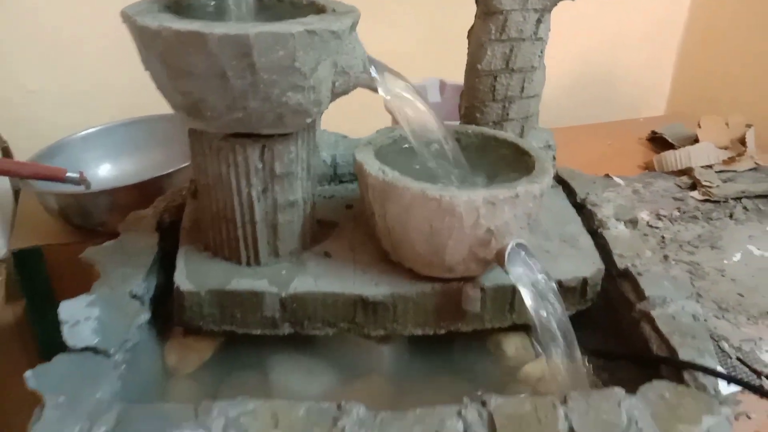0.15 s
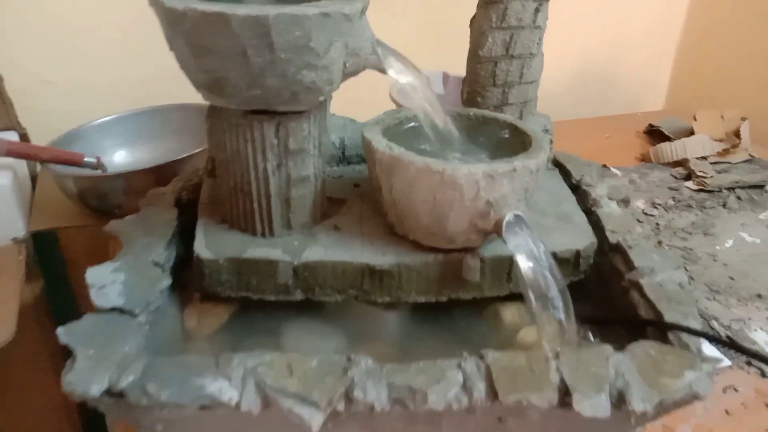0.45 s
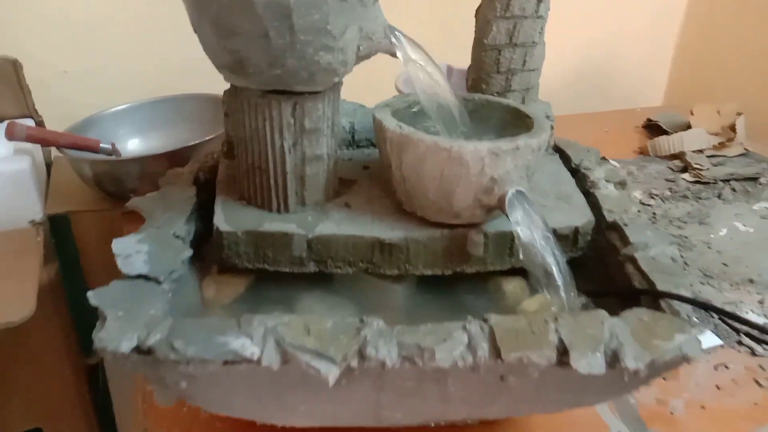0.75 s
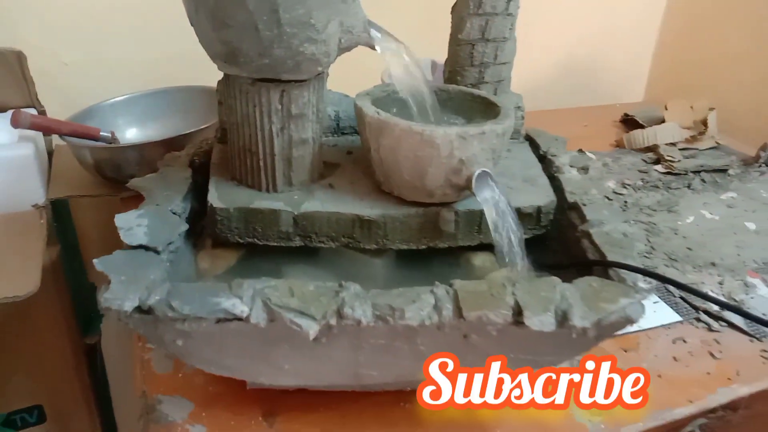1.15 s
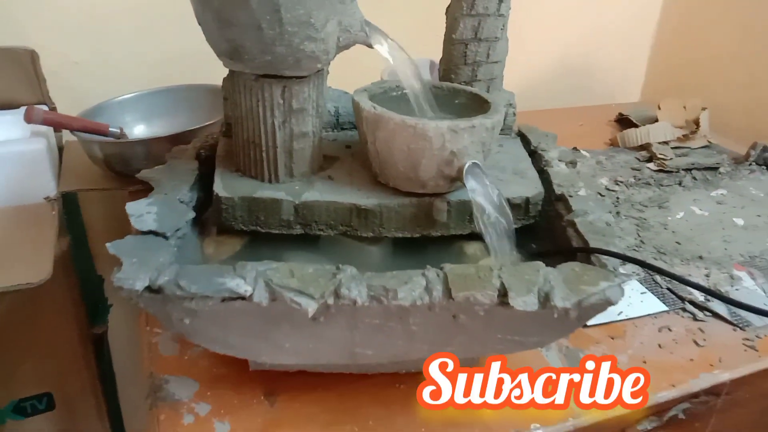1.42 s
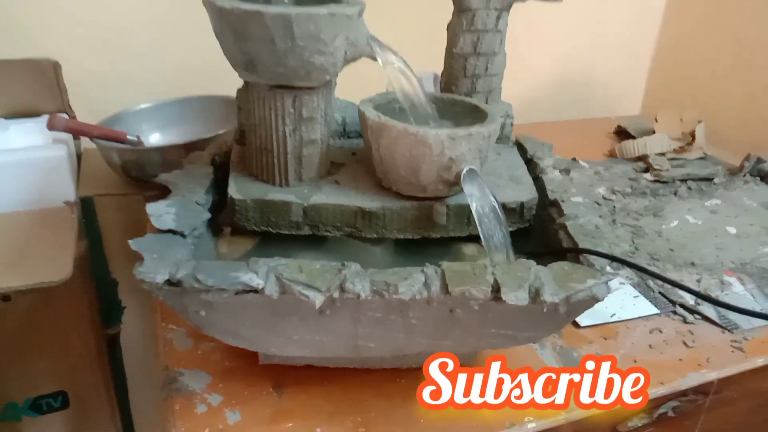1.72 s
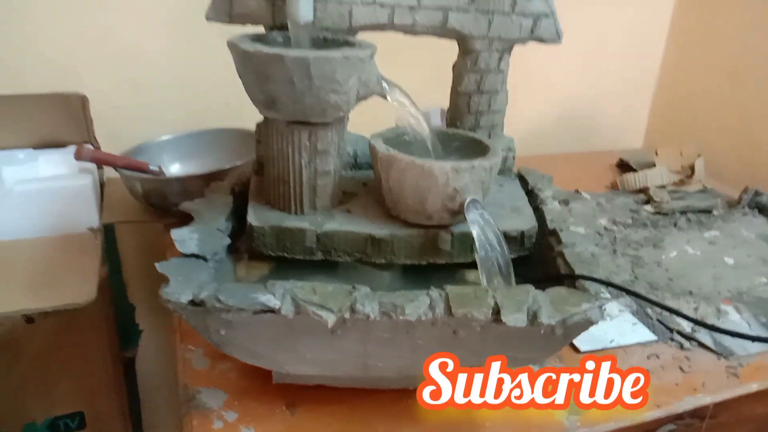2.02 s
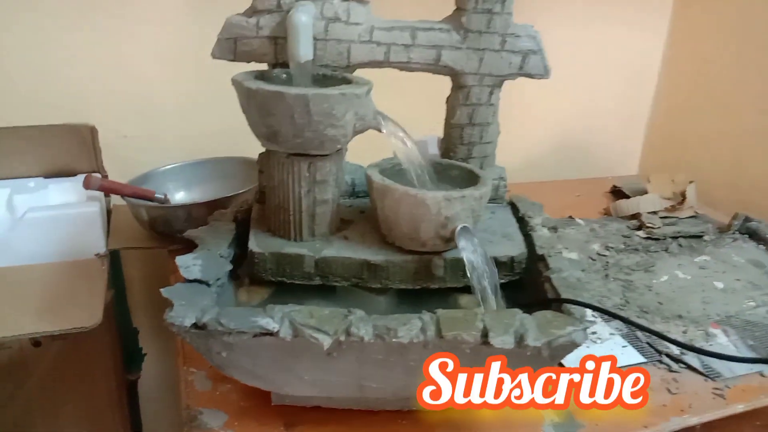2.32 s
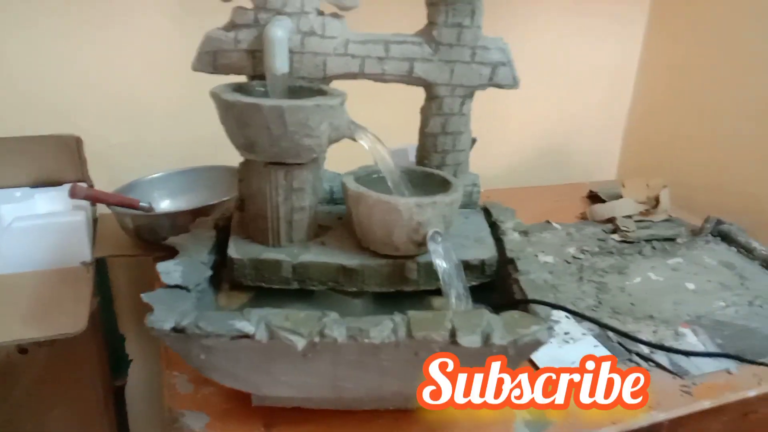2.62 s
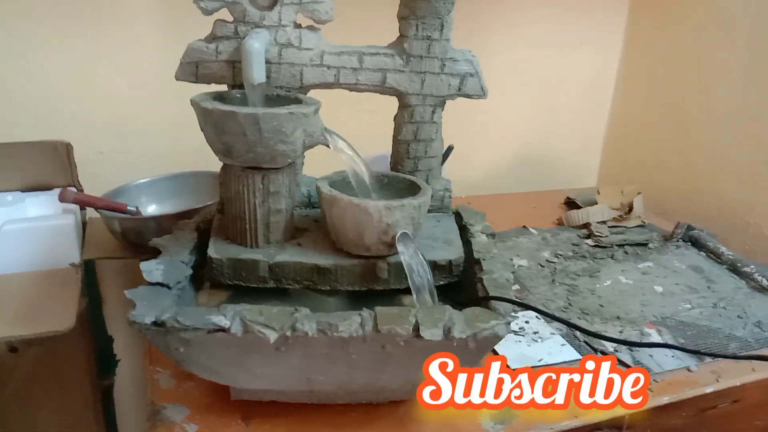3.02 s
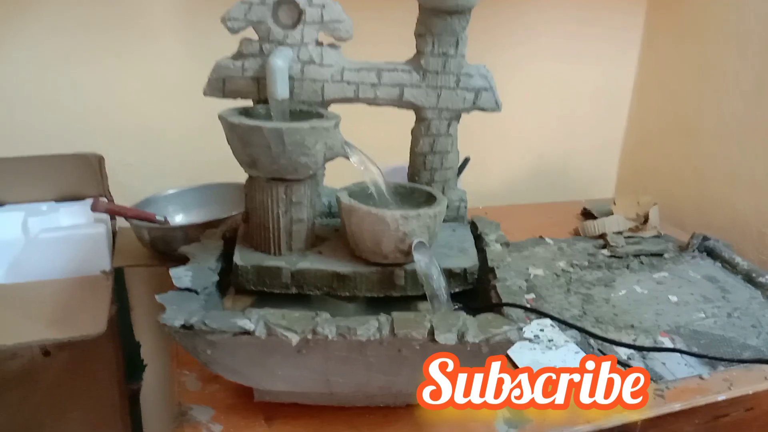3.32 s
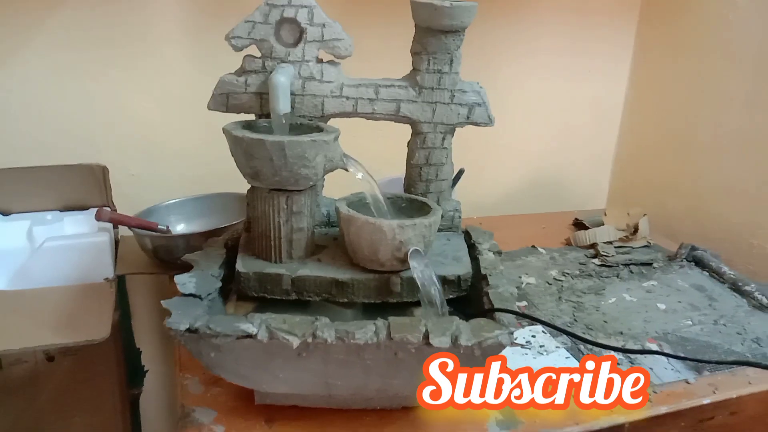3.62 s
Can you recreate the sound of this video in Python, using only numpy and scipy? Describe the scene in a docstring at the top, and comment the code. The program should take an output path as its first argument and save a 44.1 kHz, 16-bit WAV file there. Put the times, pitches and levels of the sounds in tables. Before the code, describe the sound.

Water trickles and gurgles from bowl to bowl in a small cement fountain indoors, drops plinking brightly.

```python
"""A small cement fountain indoors: water falls from bowl to bowl into a basin as the listener backs away.
It opens busy, with thick gurgle, gulps and bright drops crowded into the first 0.6 s. Just after 1.2 s
the gurgle ducks and bursts back; then gurgle and splash sink unevenly and the drops thin out to the end.
Bubbles are short climbing sines, gulps are soft puffs ringing hollow modes, froth is a swarm of bubbles;
the bare walls throw all of the water back over a low rumble of pump and room."""
import sys
import numpy as np
from scipy import signal
from scipy.io import wavfile
from scipy.ndimage import uniform_filter1d

SR = 44100
rng = np.random.default_rng(int(sys.argv[2]) if len(sys.argv) > 2 else 0)


def inscribe(sig):
    """Save sig as 16-bit PCM at rate SR to the path in sys.argv[1].

    A 1-D sig is mono; a 2-D sig holds one channel per row.
    Samples are clipped to [-1, 1] before scaling.
    """
    pcm = np.round(np.clip(np.atleast_2d(sig).T, -1, 1) * 32767)
    wavfile.write(sys.argv[1], SR, pcm.astype(np.int16))


def attenuation_scalar(level_db):
    """Turn a level in dB into a linear amplitude multiplier (20 dB per decade)."""
    decades = np.asarray(level_db, float) / 20
    return 10 ** decades


N = 165375

# Hollow ring of the bowls. Each row: pitch in Hz, weight in dB ahead of the 1/sqrt(t60) scaling, t60 in seconds.
BOWL_MODES = [(153.1, -19, 0.074), (199, -19, 0.089), (284.2, -22, 0.088), (351.7, -21, 0.14),
              (430.3, -16.5, 0.013), (595.6, -10, 0.078), (699.6, -10, 0.098), (786, -7.5, 0.05),
              (1010, -10, 0.12), (1099, -7, 0.04), (1197, -12.5, 0.032), (1276.7, 2, 0.063),
              (1367, -7.5, 0.049), (1531, -9, 0.055), (1677, -10, 0.025)]
# Colour of basin and microphone. Each row: frequency in Hz, relative gain in dB.
BASIN_COLOUR = [(880, -19.5), (1500, 9.5), (1880, -9.5), (2390, -5), (2610, -5), (2970, -6.5),
                (3220, -12.5), (4000, -8.5), (4460, -17), (5330, -7), (6310, -19.5), (7100, -12),
                (8080, -32.5), (8920, -22), (13500, -31.5), (14900, -23.5), (15500, -29), (16000, -12.5)]
BUBBLE_CYCLES = 24.2  # length of the bubbles in splash and froth


def evened(x):
    """Scales a sound to an rms of one."""
    return x / np.sqrt(np.mean(x ** 2) + 1e-20)


def read_curve(points, hz):
    """Reads a curve over frequency, with straight lines on a log axis."""
    f, value = np.transpose(points)
    return np.interp(np.log(hz + 1), np.log(f + 1), value)


def fader(curve):
    """Gain over the whole scene from rows of seconds and dB."""
    s, db = np.transpose(curve)
    return attenuation_scalar(np.interp(np.arange(N) / SR, s, db))


def add(mix, s, sound):
    """Lays a sound into the mix at s seconds, cut off at the end."""
    part = mix[round(s * SR):][:len(sound)]
    part += sound[:len(part)]


def colour_taps():
    """Minimum-phase filter with the colour of basin and microphone."""
    hz = abs(np.fft.fftfreq(4096, 1 / SR))
    log_gain = np.log(attenuation_scalar(np.maximum(read_curve(BASIN_COLOUR, hz), -80)))
    spectrum = np.exp(np.conj(signal.hilbert(log_gain)))
    return np.fft.ifft(spectrum).real[:1024]


def surges():
    """The unevenness of the stream, shared by all that it drives (dB)."""
    clump_db, clump_s = 6.5, 0.02
    swell = evened(uniform_filter1d(rng.standard_normal(N), int(clump_s * SR)))
    return clump_db * np.minimum(swell, 1.3)


def scatter(per_s, spread_db, surge_db):
    """Clicks of random sign that swell with the stream; a few are large."""
    size = attenuation_scalar(spread_db * np.minimum(rng.exponential(1, N), 3.5) + surge_db)
    struck = rng.random(N) < per_s / SR
    return size * struck * rng.choice([-1., 1.], N)


def bubble(hz, cycles):
    """An air bubble: a swelling and dying sine of a few cycles whose pitch climbs."""
    rise, onset = 0.042, 4.5  # share of the pitch gained over the cycles; larger onset starts harder
    u = np.arange(1200) / SR * hz / max(cycles, 1)  # reaches 1 after the given cycles
    tone = np.sin(2 * np.pi * cycles * (u + rise * u ** 2 / 2))
    swell = (1 - np.exp(-onset * u)) ** 2
    return tone * swell * np.exp(-2.5 * u ** 0.64)


def puff(hz, cycles):
    """A soft push of air: a few cycles under a rounded window."""
    soft = np.hanning(max(int(cycles * SR / hz), 3))
    return soft * np.sin(2 * np.pi * hz * np.arange(len(soft)) / SR) / soft.sum()


def hush():
    """Low rumble of pump and room: shaped noise whose patches of time and pitch swell and sink."""
    # Spectrum of the rumble. Each row: frequency in Hz, relative density in dB per Hz.
    rumble = [(20, -46), (59, -12.5), (157, -1.5), (511, -5), (583, -9), (1000, 2), (1300, -25),
              (2200, -120)]
    rumble_db, patch_db = -55.5, 9.2  # rms of the whole; rms swing of the patches
    hz = np.fft.rfftfreq(2048, 1 / SR)
    a, b, patches = rng.standard_normal((N // 512 + 5, 1025, 3)).T
    patches = uniform_filter1d(patches, 3, 0)  # across frequency bins
    patches = evened(uniform_filter1d(patches, 5, 1))  # across frames
    z = (a + 1j * b) * attenuation_scalar(read_curve(rumble, hz)[:, None] + patch_db * patches)
    noise = signal.istft(z, nperseg=2048, noverlap=1536)[1][:N]
    return attenuation_scalar(rumble_db) * evened(noise)


def froth():
    """Patches of froth: swarms of tiny bubbles around one size, bursting ever more faintly."""
    # Froth fizzing out after a splash. Each row: start in seconds, starting level in dB, middle pitch in Hz,
    # t60 in seconds.
    patches = [(0.269, -39.5, 3125, 0.2), (0.449, -43, 3490, 0.42), (1.386, -55.5, 5720, 1.2),
               (1.439, -44, 1730, 1), (2.412, -56, 5550, .3), (2.731, -38.5, 5060, 0.29),
               (3.018, -42.5, 2394, 0.29), (3.166, -44, 5560, 0.63), (3.344, -49, 6560, 0.53)]
    bursts_per_s, width = 900, 0.13  # width is a share of the middle pitch, to either side
    out, t = np.zeros(N), np.arange(SR // 2) / SR
    sizes = np.linspace(-1, 1, 7)
    for s, db, hz, t60 in patches:
        chance, strength = rng.random((2, len(sizes), len(t)))
        clicks = (chance < bursts_per_s / SR / len(sizes)) * np.log(strength + 1e-9)
        swarm = sum(signal.oaconvolve(c, bubble(hz * (1 + width * k), BUBBLE_CYCLES))
                    for c, k in zip(clicks, sizes))
        add(out, s, attenuation_scalar(db - 60 * t / t60) * evened(swarm[:len(t)]))
    return out


def drops():
    """Plinks and ticks that stand out: each a bubble's ring with a slap and a hiss of spray."""
    # Small bubbles. Each row: start in seconds, peak of the ring in dB, pitch in Hz, length in cycles.
    plinks = [(0.14, -33, 3030, 13), (0.2015, -33, 3290, 17.4), (0.2663, -24, 3830, 5.9),
              (0.381, -29, 3080, 7.3), (0.409, -34.5, 2930, 20), (0.5097, -28.5, 2940, 6.3),
              (0.595, -33, 2860, 11), (0.8649, -36, 3150, 12), (1.2471, -34.5, 2940, 8.2),
              (1.8018, -35, 2845, 25), (2.2553, -31, 3090, 16), (2.7317, -28, 4130, 16),
              (2.9891, -41, 3360, 26), (3.022, -34.5, 2300, 7.4), (3.4645, -33, 4030, 18),
              (0.2004, -24, 5550, 23), (0.3935, -32, 5410, 13), (0.4519, -32, 5050, 14),
              (0.4755, -28.5, 5370, 11), (0.5571, -31, 5520, 17), (0.6998, -32.5, 5150, 11),
              (0.8644, -32.5, 5380, 16), (1.0779, -29.5, 5930, 7.9), (1.3119, -33, 5630, 9.2),
              (2.3216, -33.5, 4970, 6.9), (2.605, -42.5, 5780, 21), (2.7312, -30.5, 4780, 28),
              (2.7831, -27.5, 6040, 16), (3.1727, -25.5, 5560, 11), (3.6082, -38, 5020, 28),
              (0.2004, -26.5, 6580, 10.6), (0.4838, -22, 7770, 3.9), (0.7107, -32, 6440, 6.7),
              (0.9178, -35, 6570, 28), (2.7357, -26.5, 7000, 7), (3.057, -40, 6520, 12)]
    # Tiny spray drops. Each row: start in seconds, peak of the ring in dB, pitch in Hz.
    ticks = [(0.1445, -30, 10000), (0.222, -35.5, 8700), (0.48, -31.5, 10540), (0.512, -23.5, 15800),
             (0.594, -38.5, 9040), (0.7021, -27.5, 14500), (0.87, -41, 8850), (0.9194, -35.5, 8350),
             (1.406, -37.5, 8140), (1.5516, -44, 8550), (1.8806, -33, 8530), (1.9383, -33, 8260),
             (2.2536, -39, 8630), (2.332, -37, 12100), (2.4455, -38, 8280), (2.9407, -42, 12900),
             (3.149, -36, 14610), (3.212, -31.5, 10600), (3.2776, -33.5, 9400), (3.6065, -38, 10900),
             (3.6605, -41.5, 8960)]
    plink_slap_db, tick_slap_db, tick_cycles = -3, 8, 10.2  # slap peak against the ring's peak
    spray_db, spray_s = -24, 0.02  # hiss against the click of the slap, and its decay time
    out, taps, t = np.zeros(N), colour_taps(), np.arange(4000) / SR
    rows = [(*row, plink_slap_db) for row in plinks]
    rows += [(s, db, hz, tick_cycles, tick_slap_db) for s, db, hz in ticks]
    for s, db, hz, cycles, slap_db in rows:
        slap = attenuation_scalar(spray_db) * rng.standard_normal(len(t)) * np.exp(-t / spray_s)
        slap[0] = 1
        slap = signal.fftconvolve(np.diff(slap, prepend=0), taps)
        ring = signal.fftconvolve(bubble(hz, cycles), taps)
        add(out, s, attenuation_scalar(db) * ring / abs(ring).max())
        add(out, s, attenuation_scalar(db + slap_db) * slap / abs(slap).max())
    return out


def splash(surge_db):
    """Splashing: dense small bubbles of every size, a fine fizz and drops slapping the surface."""
    # Level of the splashing. Each row: time in seconds, rms level in dB.
    splash_level = [(0.0, -45.5), (0.13, -48), (0.33, -45), (0.92, -46), (1.4, -46.5), (1.87, -50),
                    (3.43, -49), (3.75, -50)]
    fizz_db, slaps_db = -7.5, -3.5  # against the bubbles
    pitches = np.geomspace(1700, 15800, 40)
    clicks = scatter(4500, 4, surge_db)  # bubbles per second, spread in dB
    which = np.searchsorted(pitches, rng.uniform(1600, 15800, N))
    bubbles = sum(signal.oaconvolve(clicks * (which == k), bubble(hz, BUBBLE_CYCLES) * np.sqrt(hz))[:N]
                  for k, hz in enumerate(pitches))
    fizz = attenuation_scalar(fizz_db) * rng.standard_normal(N)
    slaps = attenuation_scalar(slaps_db) * evened(scatter(170, 7.5, surge_db))  # slaps per second, spread in dB
    water = evened(bubbles) + fizz + slaps
    return fader(splash_level) * evened(signal.oaconvolve(water, colour_taps())[:N])


def bowl_rings():
    """The air in the bowls: one dying sine for each hollow mode, slow ones scaled down."""
    t = np.arange(4500) / SR
    return [attenuation_scalar(db - 60 * t / t60) * np.sin(2 * np.pi * hz * t) / np.sqrt(t60) for hz, db, t60 in BOWL_MODES]


def gurgle(surge_db):
    """Small gulps each ring one hollow mode; large ones push all modes, most those near their pitch."""
    # Large gulps of air under the falling jets. Each row: time in seconds (the puff starts lead_s sooner),
    # peak in dB, pitch of the puff in Hz.
    gulps = [(0.146, -26, 1269), (0.288, -30.5, 1320), (0.379, -29.5, 1290), (0.435, -27.5, 1253),
             (0.504, -28.5, 1244), (0.59, -32.5, 1174), (0.859, -28.5, 1243), (0.967, -32, 1218),
             (1.155, -31, 1250), (1.245, -25.5, 1275), (1.262, -53, 355), (1.423, -30.5, 1273),
             (1.446, -36, 1268), (1.588, -31, 1457), (1.743, -34, 1340), (1.97, -33.5, 1348),
             (2.224, -32, 1310), (2.089, -33, 1325), (2.095, -49, 210.2), (2.25, -46, 1360),
             (2.328, -34, 1265), (2.415, -35.5, 1230), (2.448, -32.5, 1260), (2.671, -39, 1270),
             (2.925, -33.5, 1240), (3.085, -42.5, 743), (3.235, -31.5, 1138), (3.345, -36.5, 1410),
             (3.525, -37.5, 1060), (3.655, -50.5, 232)]
    # Level of the gurgle, modes from 500 Hz up. Each row: time in seconds, rms level in dB.
    gurgle_level = [(0.0, -37), (0.08, -45.5), (0.15, -35.5), (0.2, -41.5), (0.63, -40.5), (0.83, -45),
                    (0.87, -40.5), (0.91, -45), (1.2, -41.5), (1.225, -63), (1.26, -34), (1.37, -44.5),
                    (1.46, -39), (1.67, -42.5), (1.76, -46.5), (3.69, -48), (3.75, -47)]
    # Level of the modes below 500 Hz. Each row: time in seconds, rms level in dB.
    basin_level = [(0, -58), (3.75, -62)]
    small_cycles, big_cycles, lead_s = 4.3, 24, 0.009
    rings = bowl_rings()
    clicks = scatter(3000, 3, surge_db)  # gulps per second, spread in dB
    which = rng.integers(0, len(rings), N)
    rung = np.array([signal.oaconvolve(clicks * (which == k), np.convolve(ring, puff(hz, small_cycles)))[:N]
                     for k, ((hz, _, _), ring) in enumerate(zip(BOWL_MODES, rings))])
    low = np.array(BOWL_MODES)[:, 0] < 500
    out = fader(gurgle_level) * evened(rung[~low].sum(0))
    out += fader(basin_level) * evened(rung[low].sum(0))
    for s, db, hz in gulps:
        gulp = signal.fftconvolve(puff(hz, big_cycles), sum(rings))
        add(out, s - lead_s, attenuation_scalar(db) * gulp / abs(gulp).max())
    return out


def room(x):
    """Bare walls: a few echoes, then sparse taps dying by band; three tails take turns."""
    # Decay of the room. Each row: frequency in Hz, t60 in seconds.
    decay = [(300, 0.19), (1500, 0.18), (5000, 0.23), (12000, 0.056)]
    # First wall echoes. Each row: delay in seconds, gain in dB against the direct sound.
    echoes = [(.0042, -22), (.0075, -13), (0.0122, -11.5)]
    tail_db, turn_hz = -4.5, 1.3  # tails together against the direct sound; rate of the turns
    early = np.zeros(2000)
    early[0] = 1
    for s, db in echoes:
        early[round(s * SR)] = attenuation_scalar(db)
    out, t_all = signal.oaconvolve(x, early)[:N], np.arange(N) / SR
    for k in range(3):
        taps = np.zeros(SR // 2)
        at = np.arange(100, SR // 2 - 20, 20)
        taps[at + rng.integers(0, 20, len(at))] = rng.choice([-1., 1.], len(at))
        hz, t, z = signal.stft(taps, SR, nperseg=256)
        dying = z * attenuation_scalar(-60 * t / read_curve(decay, hz)[:, None])
        tail = signal.istft(dying, SR, nperseg=256)[1]
        turn = np.sqrt(2 / 3) * np.cos(2 * np.pi * (turn_hz * t_all + k / 3))
        out += attenuation_scalar(tail_db) * signal.fftconvolve(x * turn, tail / np.linalg.norm(tail))[:N]
    return out


def scene():
    """The water in its room over the rumble; the surges move the gurgle less than the splash."""
    surge_db = surges()
    water = froth() + drops() + splash(surge_db) + gurgle(0.39 * surge_db)
    return (room(water) + hush())[None]


def top_cut(x):
    """Nothing passes above the cut-off."""
    return signal.sosfilt(signal.butter(12, 16830, fs=SR, output="sos"), x)


def record(dry):
    """Cuts the lows under 52 Hz and limits the band at 15650 Hz."""
    low_cut = signal.butter(2, 52, "high", fs=SR, output="sos")
    band_limit = signal.firwin(1023, 15650, window=("kaiser", 9), fs=SR)[None]
    mix = signal.oaconvolve(signal.sosfilt(low_cut, dry), band_limit, "same")
    return top_cut(mix)


dry = scene()
out = record(dry)
inscribe(out)
```